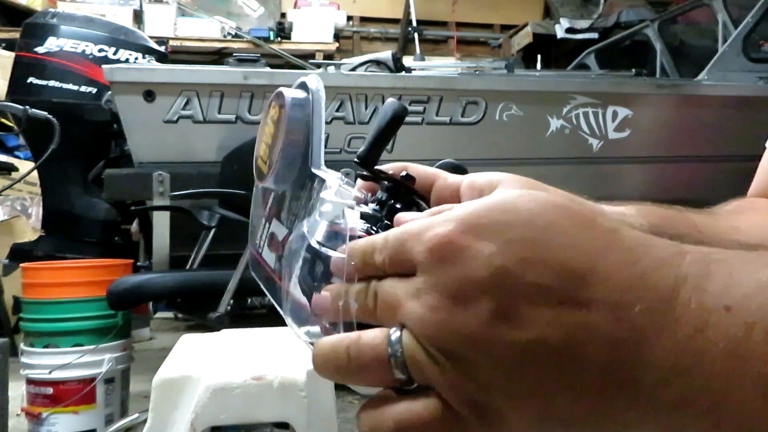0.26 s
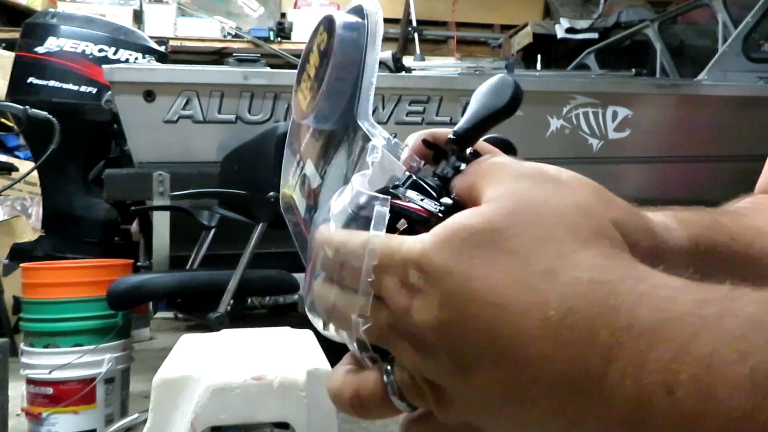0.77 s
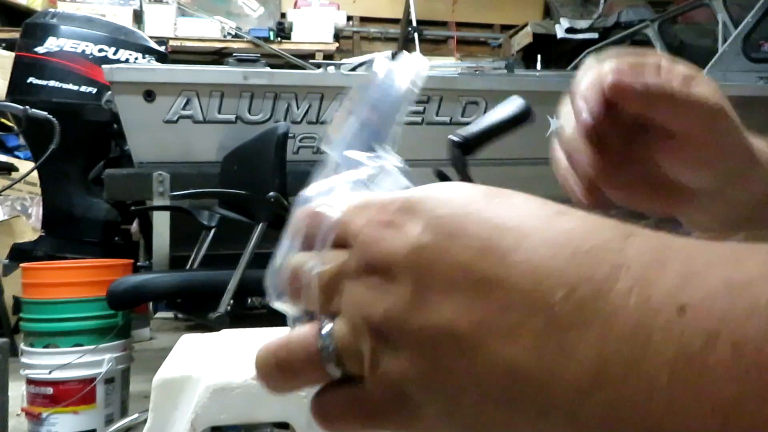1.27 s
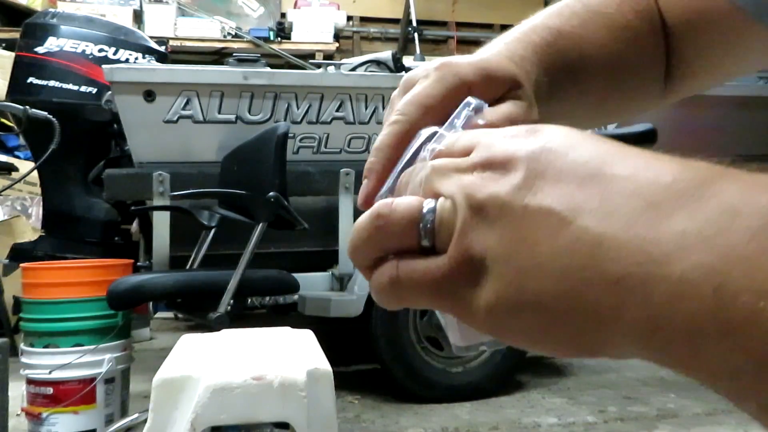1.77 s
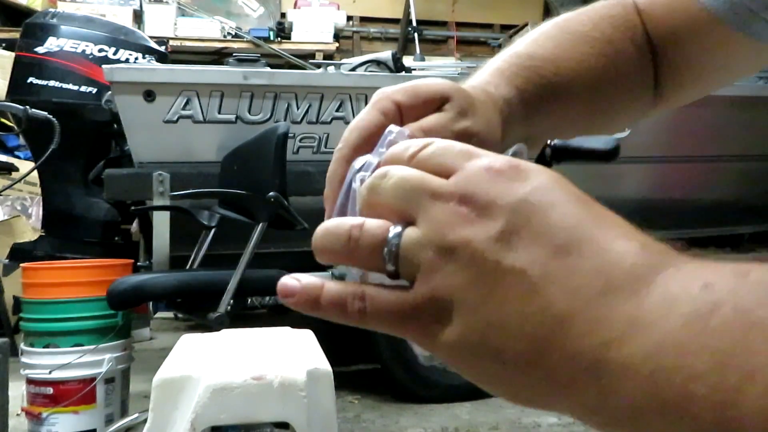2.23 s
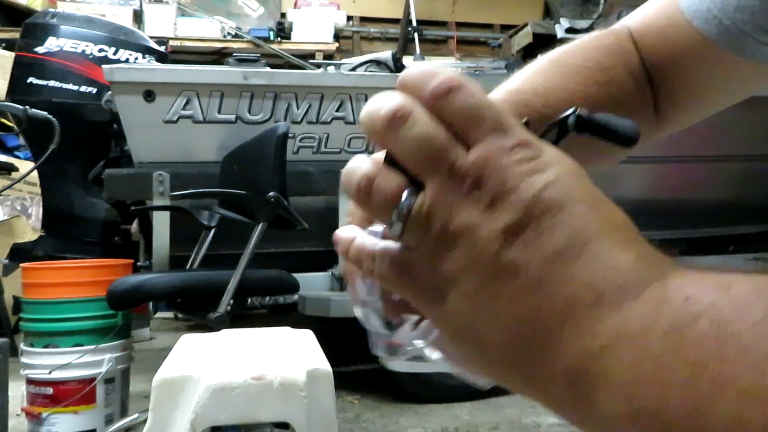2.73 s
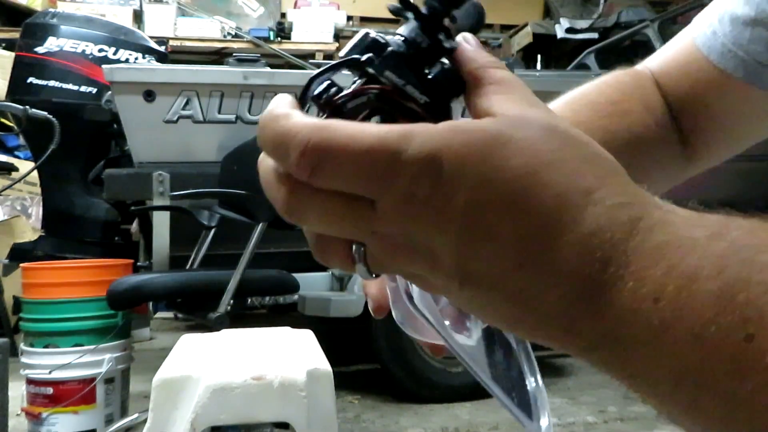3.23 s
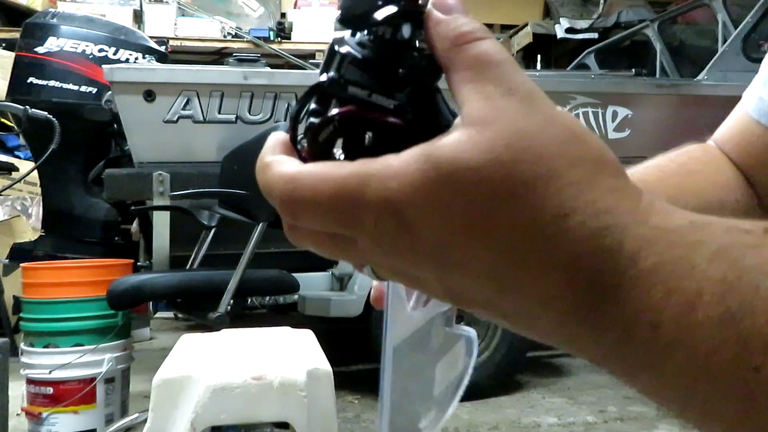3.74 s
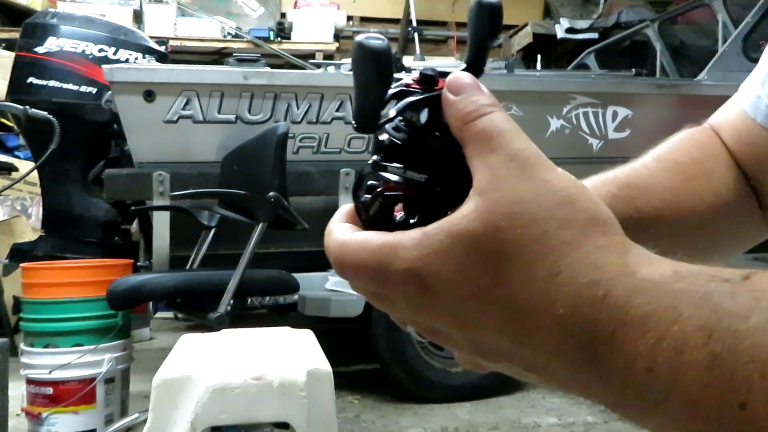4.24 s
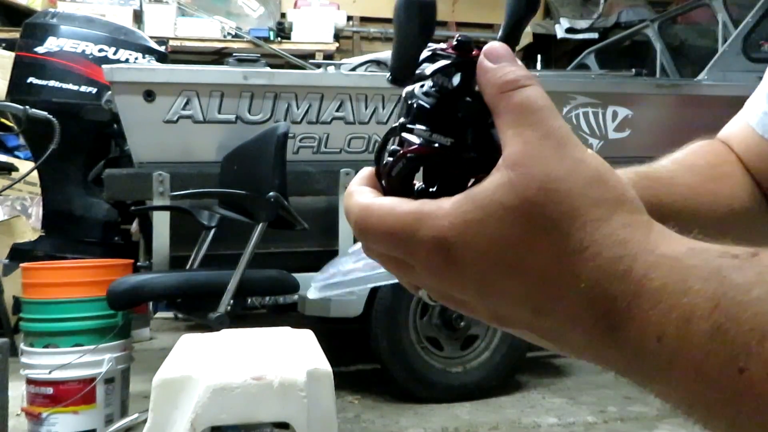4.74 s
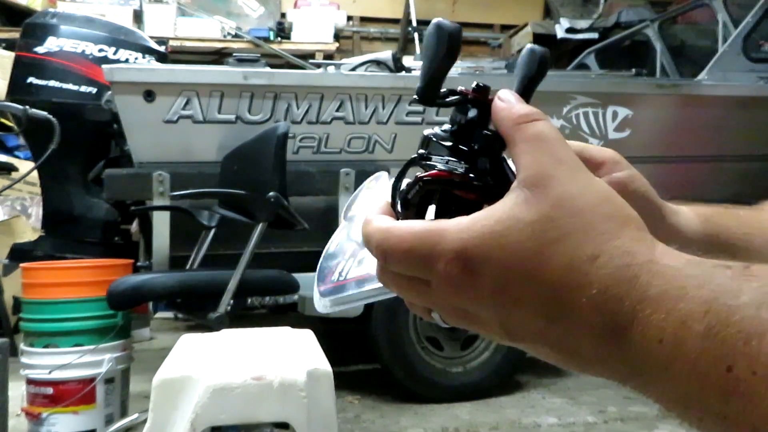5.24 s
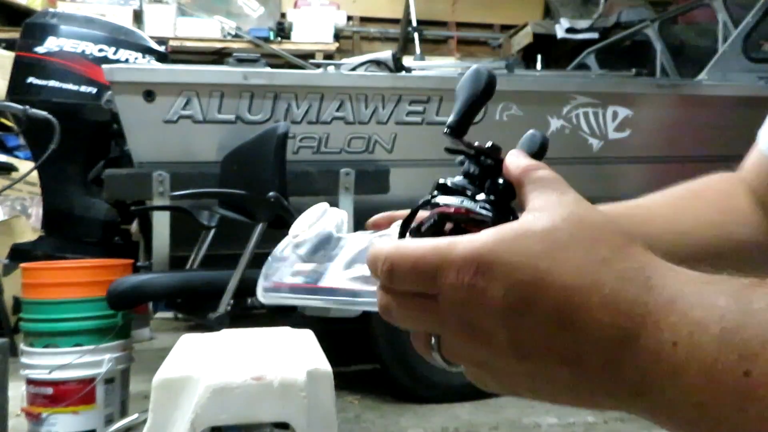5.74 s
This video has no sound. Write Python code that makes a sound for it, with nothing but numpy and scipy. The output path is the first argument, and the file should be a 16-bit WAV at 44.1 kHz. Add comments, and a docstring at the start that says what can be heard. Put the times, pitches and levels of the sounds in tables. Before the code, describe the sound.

A thin, hard plastic package buckles and pops in someone's hands, with small creaks, grainy chatter and faint rustling. A busy opening burst gives way to a short lull, then denser crackling, another quiet gap and scattered lighter ticks. Close, nearly centred pickup with a slightly doubled, hollow colour; a low steady hum fills the indoor garage.

```python
"""Room noise and a low hum, and almost at once the snaps, creaks and rustle of a stiff clear plastic
shell as hands work a small reel out of it in a garage, close by. Buckling panels snap, a flange
creaks by stick-slip, rubs drive the shell's modes with tiny slips, small panels chatter.
The sound arrives twice: a dull copy, then a bright one a few milliseconds later."""
import sys
import numpy as np
from scipy import signal
from scipy.fft import rfft, irfft
from scipy.io import wavfile
from scipy.ndimage import uniform_filter1d

SR = 44100
rng = np.random.default_rng(int(sys.argv[2]) if len(sys.argv) > 2 else 0)


def generate_wav(sig):
    """Save sig (samples, or channels by samples) to the path in sys.argv[1] as 16-bit PCM at SR."""
    pcm = np.round(np.clip(np.atleast_2d(sig).T, -1, 1) * 32767).astype(np.int16)
    wavfile.write(sys.argv[1], SR, pcm)


N = 264600

# shell modes: f/Hz, width per filter pass/Hz, level in the rustle/dB
SHELL_MODES = [(374, 430, 8), (1036, 433, 4), (1670, 1160, -4), (2485, 800, -8), (4460, 1100, -21.5)]
# colour of cracks and fizz: f/Hz, relative level/dB
CRACK_COLOUR = [(1200, -11), (2500, 7), (4000, -6.5), (6000, -6), (8000, -2), (12500, -1.5), (15700, -6),
                (16300, -25), (18000, -44)]
# buckling panels: t/s, level/dB, panel f/Hz, shell t60/s, crack level re snap/dB (before a common gain)
SNAPS = [(0.12, -33, 1070, 0.017, -29), (0.1642, -26.5, 1220, 0.0044, -23.5),
         (0.2394, -23, 1460, 0.0031, -39), (0.3403, -25.5, 1930, 0.023, -7),
         (0.388, -22.5, 830, 0.0062, -41), (0.4191, -19.5, 804, 0.026, -16),
         (0.599, -14, 1470, 0.0056, -15), (0.6185, -17.5, 1000, 0.0045, -29),
         (0.6234, -8, 1450, 0.014, -16.5), (0.7263, -13.5, 1190, 0.018, -10),
         (0.845, -28.5, 1590, 0.0061, -7.5), (0.8757, -19, 895, 0.012, -36),
         (0.9064, -23.5, 1010, 0.0094, -42), (0.9768, -31, 970, 0.0066, -36), (1.018, -40, 2300, 0.01, -7),
         (1.0454, -28.5, 1140, 0.022, -14.5), (1.2092, -19.5, 990, 0.0038, -43),
         (1.242, -21, 1490, 0.018, -33), (1.764, -11, 1150, 0.0053, -41), (1.7795, -37, 1210, 0.0091, -2),
         (1.867, -20.5, 920, 0.02, -54.5), (1.922, -26, 1060, 0.016, -35),
         (1.9487, -38.5, 1520, 0.01, -9.5), (1.9985, -51, 1500, 0.0085, -1),
         (2.044, -32, 1890, 0.0061, -26), (2.062, -32, 1920, 0.0062, -18), (2.09, -19, 1130, 0.034, -17.5),
         (2.149, -28.5, 1026, 0.041, -26), (2.182, -33.5, 1610, 0.04, -8.5),
         (2.258, -34.5, 1500, 0.01, -13), (2.311, -11.5, 1460, 0.0035, -6.5),
         (2.359, -20.5, 2620, 0.0018, -36), (2.382, -23.5, 1130, 0.045, -15.5),
         (2.403, -22, 830, 0.015, -33), (2.43, -16, 1120, 0.018, -52), (2.62, -19, 1290, 0.016, -25),
         (2.6272, -16, 880, 0.027, -26.5), (2.7093, -12, 910, 0.014, -29), (2.7494, -13, 1070, 0.024, -24),
         (2.76, -25, 1020, 0.016, -8), (2.8125, -20.5, 690, 0.04, -18), (2.8691, -23.5, 2300, 0.0073, -21),
         (2.9126, -19.5, 1130, 0.0093, -27), (2.918, -18, 1440, 0.035, -7.5),
         (2.9827, -24, 1060, 0.0066, -33), (3.058, -26.5, 1320, 0.011, -19),
         (3.0701, -12, 1236, 0.017, -22), (3.096, -11.5, 1080, 0.019, -28), (3.1186, -34, 1070, 0.052, -5),
         (3.145, -26.5, 816, 0.048, -21), (3.169, -27.5, 332, 0.017, -35), (3.6715, -30, 1160, 0.081, -20),
         (3.734, -22, 1510, 0.0018, -42), (3.7791, -25.5, 1150, 0.023, -36),
         (4.237, -35.5, 1080, 0.026, -29), (4.407, -30, 980, 0.028, -17.5),
         (4.4585, -35.5, 1060, 0.035, -42), (4.585, -24.5, 1030, 0.0067, -45),
         (4.6199, -24, 1440, 0.02, -12), (4.757, -34.5, 1410, 0.087, -12.5),
         (4.8573, -30.5, 900, 0.0045, -41), (5.1065, -27.5, 1060, 0.017, -21.5),
         (5.2362, -22.5, 1460, 0.022, -22), (5.296, -29.5, 656, 0.055, -30), (5.335, -33, 1190, 0.011, -33),
         (5.374, -19, 1390, 0.029, -10), (5.3755, -18.5, 523, 0.024, -36),
         (5.4166, -20.5, 1180, 0.016, -30), (5.421, -16.5, 1270, 0.004, -31),
         (5.4373, -28.5, 1500, 0.0086, -14), (5.479, -27, 495, 0.021, -17), (5.5407, -35, 1260, 0.034, -15),
         (5.6471, -26.5, 1160, 0.011, -30), (5.774, -32.5, 1810, 0.0065, -30)]


def snaps():
    """Strain crackles until a panel buckles; it rings briefly, shakes the modes and cracks in the treble."""
    body, crack = np.zeros(N), np.zeros(N)
    length, lead = 2000, 500  # samples
    t = np.arange(length) / SR
    crack_decay = amp(-60 * t / 0.0099) + amp(-43 - 60 * t / 0.038)
    crack_shape = (1 - np.exp(-t / 0.00087)) * crack_decay
    for start_s, level_db, panel_hz, shell_t60_s, crack_db in SNAPS:
        noise = rng.standard_normal((len(SHELL_MODES) + 1, length))
        shake = np.zeros(length)
        for (mode_hz, width_hz, _), drive in zip(SHELL_MODES, noise):
            # modes near the panel's pitch are shaken most
            nearness = amp(-14.0 * abs(np.log2(mode_hz / panel_hz)))
            shake += nearness * resonate(drive, mode_hz, width_hz)

        strain = amp(level_db - 23.5 - 1500.0 * t[lead:0:-1]) * shake[-lead:]
        add(body, start_s - lead / SR, strain)

        panel = amp(9.5) * ring(panel_hz, t60_s=0.0056, rise_s=0.00041)
        decay = amp(-60 * t / shell_t60_s) + amp(-19.5 - 60 * t / 0.047)
        shell = amp(-0.5) * shake * decay * (1 - np.exp(-t / 0.0014))
        add(body, start_s, amp(level_db) * (panel + shell))
        add(crack, start_s, amp(level_db + crack_db) * noise[-1] * crack_shape)
    return body + amp(9.5) * np.std(crack) * coloured(crack, CRACK_COLOUR)


def rustle():
    """Tiny uneven slips drive each shell mode in its own short spells; sliding skin adds a fizz."""
    *mode_gains, fizz_gain = pressure()
    fizz = coloured(slips(per_s=5300.0, spread_db=4.2), CRACK_COLOUR)
    lower = signal.filtfilt(*signal.butter(2, 10000, fs=SR), fizz)
    upper = fizz - lower
    out = fizz_gain * (amp(spells(2.5)) * lower + amp(spells(2.5)) * upper)
    ticks = slips(per_s=300.0, spread_db=5.0)  # sparser slips, shared by all modes
    for gain, (mode_hz, width_hz, mode_db) in zip(mode_gains, SHELL_MODES):
        level = amp(mode_db + spells(2.2))
        drive = slips(per_s=2200.0, spread_db=3.4) + ticks
        out += gain * level * resonate(drive, mode_hz, width_hz)
    return out


# rubs and squeezes: t/s, hold/s, level/dB, focus/octaves above 1 kHz, fizz level re rub/dB
RUBS = [(0.065, 0.012, -47, 0.7, -14), (0.177, 0.02, -45.5, 0.9, -15), (0.237, 0.0065, -41.5, 0.26, -19),
        (0.271, 0.0066, -44.5, 1.5, -18), (0.4, 0.013, -46, 1, -14), (0.518, 0.018, -50.5, -0.5, -33),
        (0.569, 0.016, -49, -0.3, -11.5), (0.782, 0.019, -42, 1, -22), (0.851, 0.012, -56, -9, 1),
        (1.002, 0.035, -52.5, 0.1, -27), (1.043, 0.013, -33, 3, -27), (1.234, 0.013, -32.5, 3, -24),
        (1.755, 0.028, -46, 2, -17), (2.072, 0.088, -45.5, 3.5, -19), (2.198, 0.025, -46.5, 0.3, -24),
        (2.269, 0.019, -42, 0.2, -21), (2.381, 0.012, -40, 0.5, -16), (2.702, 0.012, -34.5, 0.1, -15),
        (2.737, 0.037, -36, 0.4, -13), (2.871, 0.02, -37.5, 0.5, -17), (2.916, 0.01, -26, 2.7, -27),
        (3.123, 0.036, -39.5, 0.06, -15), (3.225, 0.0098, -44, 2, -16.5), (4.656, 0.015, -40.5, 2.5, -21),
        (5, 0.05, -52.5, 0.3, -24), (5.064, 0.032, -43.5, 1.0, -10), (5.281, 0.0057, -43.5, 2, -11.5),
        (5.413, 0.022, -49, 1.2, -4.5), (5.48, 0.0058, -35.5, 1.86, -28)]
RISE_DB_PER_S, FALL_DB_PER_S = 474, 467
# faint rustle of the holding hands: t/s, level/dB
GRIP = [(0, -82), (0.3, -62), (0.9, -50), (1.15, -62.5), (1.35, -68), (1.7, -54.5), (2.45, -61.5),
        (3.0, -53.5), (3.35, -58.5), (4.1, -69.5), (4.45, -57), (4.95, -61.5), (5.15, -65), (5.35, -65),
        (5.6, -65.5), (6, -64)]
GRIP_FOCUS_OCTAVES, GRIP_FIZZ_DB = 0.67, -15  # above 1 kHz; re grip level


def pressure():
    """Gains of the shell modes and the fizz: a light grip plus rubs that swell, hold and fade."""
    t = np.arange(0, N + 64, 64) / SR
    grip_db = np.interp(t, *np.transpose(GRIP))
    power = amp(grip_db + shares_db(GRIP_FOCUS_OCTAVES, GRIP_FIZZ_DB)) ** 2
    for start_s, hold_s, level_db, focus_octaves, fizz_db in RUBS:
        rise_db = -RISE_DB_PER_S * np.maximum(start_s - t, 0)
        fall_db = -FALL_DB_PER_S * np.maximum(t - start_s - hold_s, 0)
        power = power + amp(level_db + rise_db + fall_db + shares_db(focus_octaves, fizz_db)) ** 2
    return [np.interp(np.arange(N) / SR, t, np.sqrt(p)) for p in power]


ABOVE_DB_PER_OCTAVE, BELOW_DB_PER_OCTAVE = 8.5, 5.5


def shares_db(focus_octaves, fizz_db):
    """Drive of each shell mode, weaker away from the focus, with the fizz last."""
    away = np.log2(np.transpose(SHELL_MODES)[0] / 1000) - focus_octaves
    modes_db = np.where(away > 0, -ABOVE_DB_PER_OCTAVE * away, BELOW_DB_PER_OCTAVE * away)
    return np.append(modes_db, fizz_db)[:, None]


# stick-slip of a flange: start t/s, end t/s, slip rate/Hz, mean level/dB, mean f/Hz
CREAKS = [(0.272, 0.294, 130, -18, 1060), (0.777, 0.816, 125, -17, 1090), (0.922, 0.933, 180, -27, 1170)]


def creaks():
    """Stick-slip at uneven intervals; each slip is a short ring of varied level and pitch."""
    out = np.zeros(N)
    for start_s, end_s, rate_hz, level_db, pitch_hz in CREAKS:
        chance = rng.standard_normal((40, 3))
        times_s = start_s + (np.arange(40) + 0.11 * chance[:, 0]) / rate_hz
        for slip_s, (_, loudness, detune) in zip(times_s[times_s < end_s], chance):
            slip = ring(pitch_hz * (1 + 0.12 * detune), t60_s=0.007, rise_s=0.00016)
            add(out, slip_s, amp(level_db + 1.5 * loudness) * slip)
    return out


# small panels rubbed into ringing: t/s, length/s, f/Hz, level/dB
CHATTERS = [(0.253, 0.029, 1800, -36), (0.27, 0.017, 2700, -46), (0.403, 0.024, 1315, -37.5),
            (0.63, 0.063, 2750, -46), (0.722, 0.035, 3980, -47), (0.861, 0.067, 1350, -42),
            (1.22, 0.029, 1376, -37.5), (2.201, 0.018, 2480, -48), (2.69, 0.064, 2470, -41),
            (2.912, 0.013, 3390, -33), (3.217, 0.031, 1120, -41.5), (4.458, 0.013, 1125, -33.5),
            (4.61, 0.014, 2810, -41.5), (5.45, 0.028, 1060, -52)]
CHATTER_WIDTH_RATIO, CHATTER_EDGE_S = 0.13, 0.0025  # width re pitch


def chatters():
    """Dense slips ring one small panel at a time, heard as a narrow grainy band."""
    out = np.zeros(N)
    drive = slips(per_s=2500.0, spread_db=0.6)
    for start_s, length_s, pitch_hz, level_db in CHATTERS:
        t = np.arange(0, length_s + 4 * CHATTER_EDGE_S, 1 / SR)
        rise = 1 - np.exp(-t / CHATTER_EDGE_S)
        fall = np.exp(-np.maximum(t - length_s, 0) / CHATTER_EDGE_S)
        part = drive[round(start_s * SR):][:len(t)]
        band = resonate(part, pitch_hz, CHATTER_WIDTH_RATIO * pitch_hz)
        add(out, start_s, amp(level_db) * rise * fall * band)
    return out


# garage decay: f/Hz, t60/s
GARAGE_T60 = [(300, 0.18), (1500, 0.12), (5000, 0.21), (14000, 0.072)]


def garage(x):
    """Sparse echoes of random sign, decaying at a rate set by frequency; a centre and a side tail."""
    taps = np.zeros((2, SR // 2))
    slots = np.arange(300, SR // 2 - 20, 20)
    at = slots + rng.integers(0, 20, (2, len(slots)))
    np.put_along_axis(taps, at, rng.choice([-1.0, 1.0], at.shape), 1)
    hz, t, bands = signal.stft(taps, SR, nperseg=256)
    decay = amp(-60 * t / read(GARAGE_T60, hz)[:, None])
    tail = signal.istft(bands * decay, SR, nperseg=256)[1]
    return signal.fftconvolve(x[None], tail / np.linalg.norm(tail[0]), axes=1)[:, :N]


# room noise colour: f/Hz, relative level/dB
AIR_COLOUR = [(20, -51), (60, -7), (150, -11), (185, -3.5), (400, -15.5), (800, -21.5), (1760, -31),
              (4060, -35), (8000, -46.5), (13500, -43), (15700, -56), (16000, -94)]
AIR_DB = -49.5
# motor hum: f/Hz, width/Hz, level/dB
HUM = [(197.1, 0.48, -48.5), (475.4, 11, -63), (43.2, 15, -60.5)]


def room_noise():
    """Broad room noise and a motor hum whose tones waver by slow random modulation."""
    out = amp(AIR_DB) * coloured(rng.standard_normal(N), AIR_COLOUR)
    t = np.arange(N) / SR
    for tone_hz, width_hz, level_db in HUM:
        r = np.exp(-np.pi * width_hz / SR)
        drift = signal.lfilter([1], [1, -r], rng.standard_normal((2, N)))
        wander = 3.5 + evened(drift[0]) + 1j * evened(drift[1])
        tone = (wander * np.exp(2j * np.pi * tone_hz * t)).real
        out += amp(level_db) * evened(tone)
    return out


# left-right noise colour: f/Hz, relative level/dB
WIDE_COLOUR = [(60, -8.5), (300, 7.5), (2000, -5), (5000, -9.5), (11000, -19.5), (12000, -67)]
WIDE_DB = -66


def side_noise():
    """Faint coloured noise of opposite sign left and right."""
    return amp(WIDE_DB) * coloured(rng.standard_normal(N), WIDE_COLOUR)


def ring(hz, t60_s, rise_s):
    """A damped panel mode with a soft start."""
    t = np.arange(2000) / SR
    return np.sin(2 * np.pi * hz * t) * amp(-60 * t / t60_s) * (1 - np.exp(-t / rise_s)) ** 2


def resonate(x, hz, width_hz):
    """A two-pole resonance passed twice for steep skirts, to rms 1."""
    r = np.exp(-np.pi * width_hz / SR)
    section = [0.98, 0.0076, -1.003, 1, -2 * r * np.cos(2 * np.pi * hz / SR), r * r]
    return evened(signal.sosfilt(2 * [section], x))


def slips(per_s, spread_db):
    """Random clicks of either sign, a few much larger than the rest."""
    size_db = spread_db * np.minimum(rng.exponential(1, N), 5)
    size = amp(size_db) * rng.choice([-1.0, 1.0], N)
    return size * (rng.random(N) < per_s / SR)


def spells(depth_db):
    """A level in dB that wanders over some 20 ms; depth is rms."""
    smooth = uniform_filter1d(rng.standard_normal(N), size=700)
    return depth_db * evened(uniform_filter1d(smooth, size=700))


def coloured(x, points):
    """Shapes x by a spectrum, to rms 1."""
    gain = amp(read(points, np.fft.rfftfreq(len(x), 1 / SR)))
    return evened(irfft(rfft(x) * gain, len(x)))


def read(points, hz):
    """Interpolates a table over log frequency."""
    f, value = np.transpose(points)
    return np.interp(np.log(hz + 1), np.log(f + 1), value)


def amp(db):
    """dB to amplitude."""
    return 10 ** (np.asarray(db) / 20)


def evened(x):
    """Scales x to rms 1."""
    return x / np.sqrt(np.mean(x ** 2) + 1e-20)


def late(x, count):
    """Delays x by count samples."""
    return np.concatenate([np.zeros(count), x[:-count]])


def add(mix, start_s, sound):
    """Adds a sound into the mix in place."""
    part = mix[round(start_s * SR):][:len(sound)]
    part += sound[:len(part)]


def scene():
    """Everything sits near the centre; only some treble and a little noise differ left and right."""
    shell = snaps() + creaks() + rustle() + chatters()
    tail, side_tail = garage(shell)
    mid = shell + amp(-13.5) * tail + room_noise()
    bright = amp(-11.5) * np.gradient(shell) + amp(-36.0) * side_tail
    bright = signal.lfilter(*signal.butter(1, 2000, "high", fs=SR), bright)
    side = signal.lfilter(*signal.butter(2, 11000, fs=SR), bright) + side_noise()
    return np.array([mid + side, mid - side])


SECOND_PATH_SAMPLES, PORT_GAP_SAMPLES, EDGE_HZ = 166, 26, 18100


def record(dry):
    """The centre arrives twice, dull then bright; the sides pass two ports a short way apart."""
    mid, side = (dry[0] + dry[1]) / 2, (dry[0] - dry[1]) / 2
    dull = signal.filtfilt(*signal.butter(3, 9000, fs=SR), mid)
    # later copy: weaker in the bass, with scattered near reflections that fill the comb's notches
    scatter = rng.standard_normal(900) * amp(-60 * np.arange(900) / SR / 0.018)
    scatter /= np.linalg.norm(scatter)
    second = amp(-4) * mid + amp(-13) * (mid - dull)
    second += amp(-27) * signal.oaconvolve(mid, scatter)[:N]
    mid = 0.84 * (dull + late(second, SECOND_PATH_SAMPLES))
    side = late(side + 0.71 * late(side, PORT_GAP_SAMPLES), SECOND_PATH_SAMPLES // 2)
    both = np.array([mid + side, mid - side])
    lowpass = signal.firwin(511, EDGE_HZ, window=("kaiser", 9), fs=SR)
    return signal.oaconvolve(both, lowpass[None], "same")


dry = scene()
out = record(dry)
generate_wav(out)
```